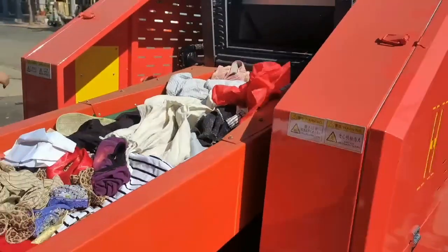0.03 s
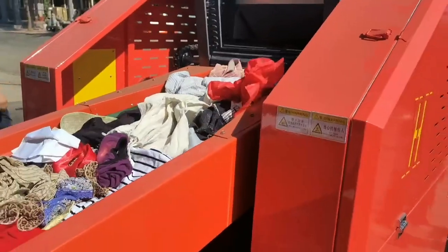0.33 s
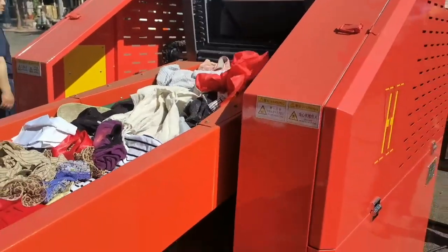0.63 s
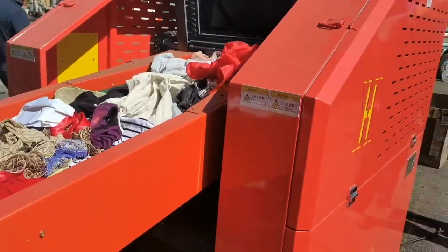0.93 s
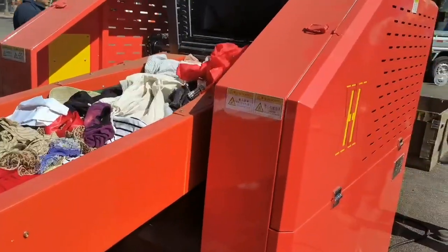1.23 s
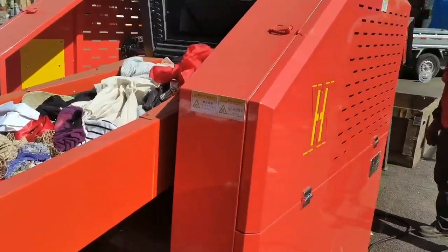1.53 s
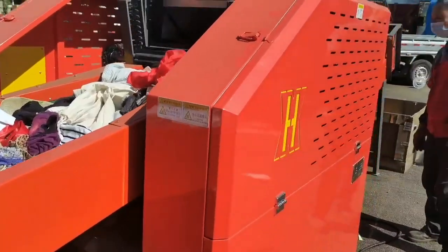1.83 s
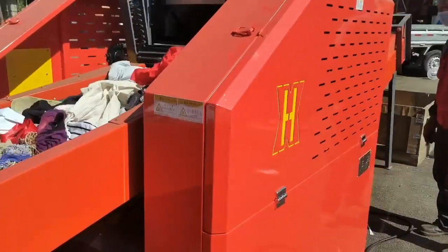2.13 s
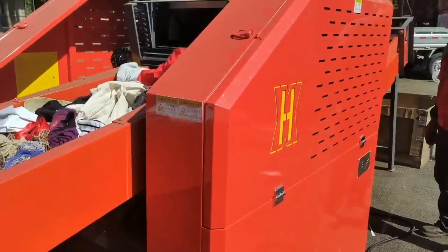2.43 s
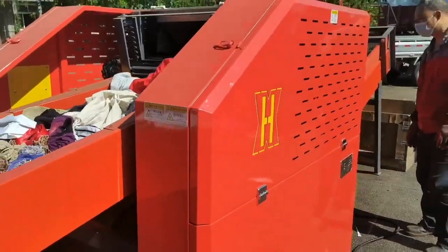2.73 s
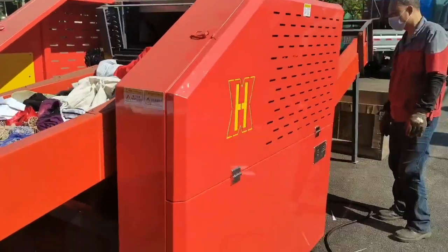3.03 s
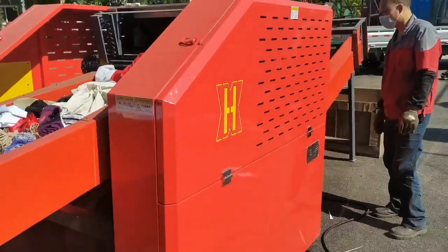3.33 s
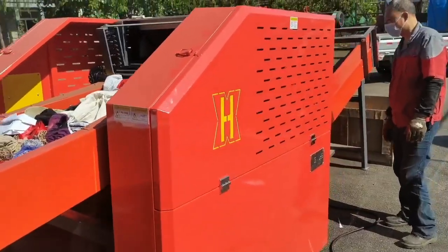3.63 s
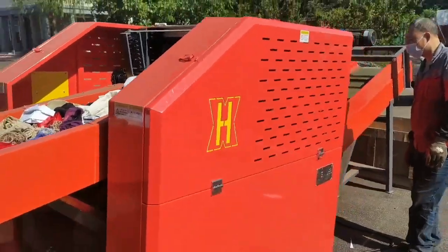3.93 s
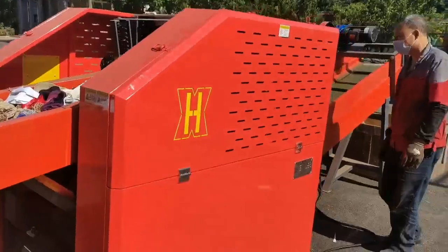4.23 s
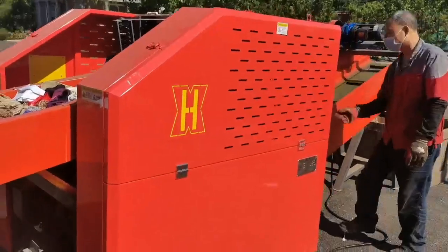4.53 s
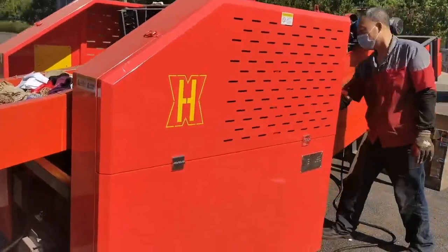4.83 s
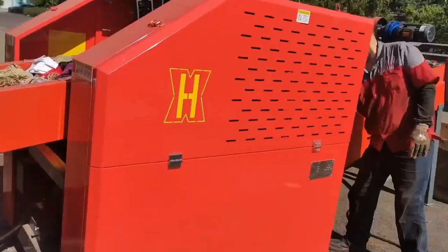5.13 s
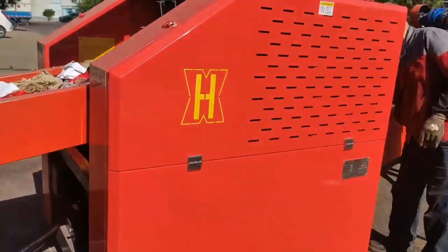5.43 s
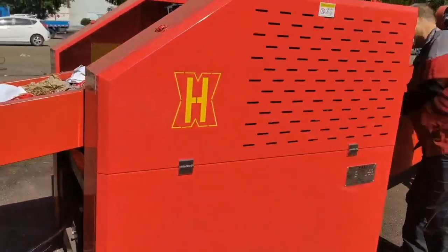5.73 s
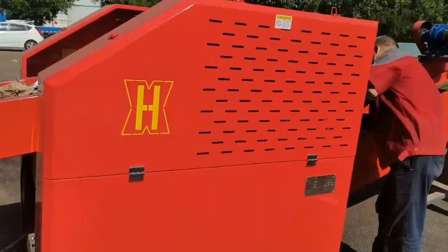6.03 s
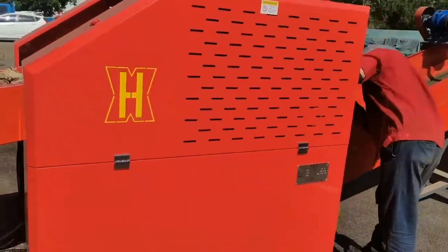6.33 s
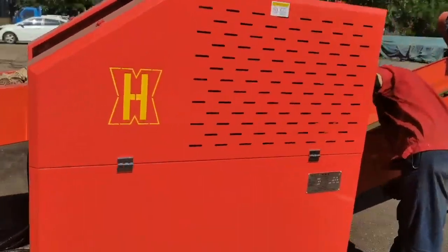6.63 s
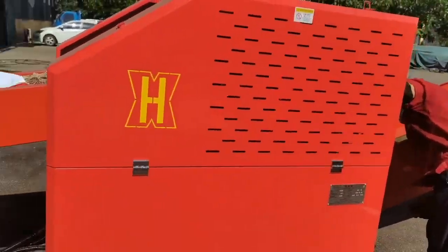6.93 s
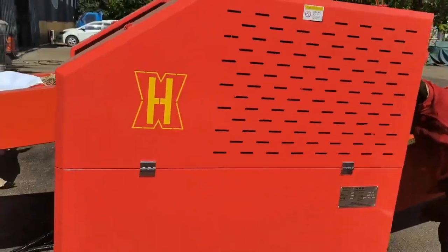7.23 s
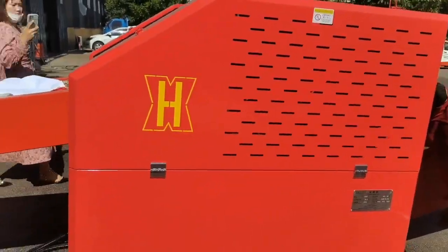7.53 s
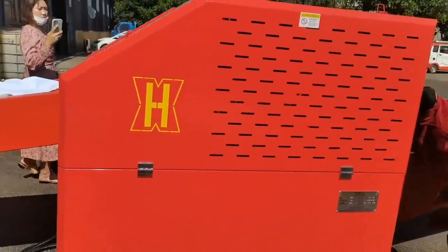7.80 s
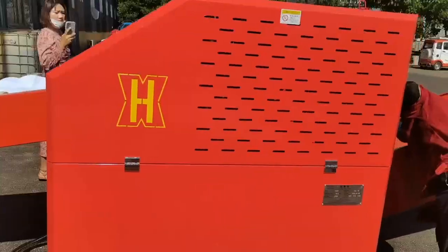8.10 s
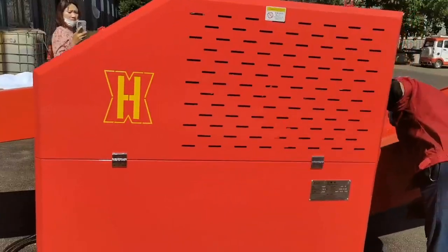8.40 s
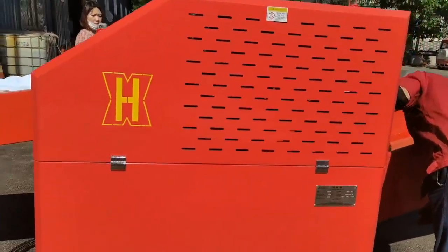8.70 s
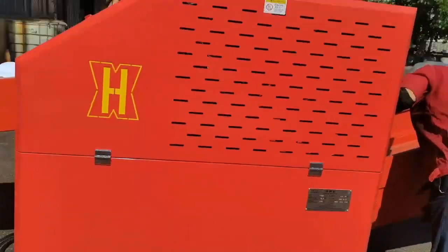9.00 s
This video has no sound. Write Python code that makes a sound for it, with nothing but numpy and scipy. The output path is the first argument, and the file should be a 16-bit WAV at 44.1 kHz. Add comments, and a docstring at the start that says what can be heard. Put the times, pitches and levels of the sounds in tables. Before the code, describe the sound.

Loud, throbbing machine hum from an outdoor shredder, its blades scraping and clanking through cloth in a fast, even rhythm.

```python
"""Outdoors, a big cloth shredder is running. Every turn of its cutter repeats the same gear knocks, which
set the steel housing droning, and the same round of metallic scrapes as the blades bite the cloth.
The drive rattles and whines, loose parts tap the panels, and the bites make the cutter box clank.
The microphone is carried past three places: the feed belt, a corner and the side of the drive guard,
where a little wind catches it."""
import sys
import numpy as np
from scipy import signal
from scipy.fft import rfft, irfft, next_fast_len
from scipy.io import wavfile
from scipy.ndimage import map_coordinates

SR = 44100
rng = np.random.default_rng(int(sys.argv[2]) if len(sys.argv) > 2 else 0)


def digitize_waveform(pressure):
    """Quantize a signal to 16-bit integers and store it at the path in sys.argv[1].

    Rows of a 2-D input are taken as channels; values are limited to [-1, 1].
    """
    field = np.atleast_2d(pressure).T
    bounded = np.clip(field, -1, 1)
    quanta = np.round(bounded * 32767).astype(np.int16)
    wavfile.write(sys.argv[1], SR, quanta)


N = 399546

TURN_HZ = 3.828  # turns of the cutter per second
TOP_HZ = 14200  # the highest sound the microphone picks up

# the housing's strong tones: (multiple of the turn rate, level at belt [dB], corner [dB], guard [dB])
STRONG_TONES = [(18, -48.5, -46.5, -43.0), (24, -52.5, -47.5, -44.0), (34, -45.0, -48.0, -41.5),
                (36, -45.0, -50.0, -44.0), (37, -36.5, -44.0, -41.0), (38, -38.5, -44.0, -43.5),
                (40, -50.0, -48.0, -42.0), (42, -43.0, -46.0, -48.0), (46, -38.0, -36.0, -36.0),
                (47, -46.0, -42.0, -40.0), (48, -45.0, -41.5, -36.0), (54, -41.0, -43.5, -38.0),
                (57, -42.0, -41.5, -44.0), (58, -31.5, -31.0, -39.0), (59, -36.5, -35.5, -37.5),
                (60, -33.5, -34.5, -38.5), (61, -38.5, -37.0, -39.0), (62, -34.0, -32.5, -36.5),
                (64, -43.0, -47.0, -31.5), (65, -39.5, -45.0, -31.5), (66, -39.0, -36.0, -32.0),
                (67, -44.5, -41.5, -34.0), (68, -54.5, -40.5, -33.5), (70, -41.0, -45.5, -33.0),
                (71, -33.5, -37.0, -36.0), (76, -42.5, -46.0, -46.0), (77, -45.0, -46.0, -43.0),
                (83, -48.0, -47.0, -34.5), (84, -49.0, -47.5, -36.5), (85, -46.5, -42.5, -39.5),
                (86, -51.0, -47.5, -37.0), (88, -52.0, -50.0, -40.0), (89, -48.0, -55.0, -41.5),
                (94, -42.5, -50.0, -37.5), (95, -37.5, -47.5, -35.0), (101, -43.5, -43.0, -41.0),
                (111, -43.0, -50.0, -46.5), (112, -45.0, -49.0, -44.0), (131, -50.0, -57.0, -43.0)]
# the housing's weaker tones: (pitch [Hz], level at belt [dB], corner [dB], guard [dB])
WEAK_TONES = [(30,-74,-74,-68), (55,-67,-66,-60), (80.4,-58,-56,-54), (116,-51,-48,-43.5),
              (160.2,-48,-52,-46), (202,-44,-46,-44), (240.5,-49,-50.5,-42), (273.3,-48,-45.5,-40.5),
              (323.4,-47.5,-49.5,-43), (400.4,-49,-50.5,-45.5), (471,-53,-58,-53), (548,-65,-58,-58)]
# the blades in biting order: (clank [dB], rasp [dB], hiss [dB], heel chink [dB], fade time [s])
BLADES = [(-29.5,-28.5,-31.5,-26,0.027), (-29.5,-33,-33,-34,0.022), (-52,-32.5,-38,-31,0.019),
          (-29,-28.5,-32,-44,0.028), (-24.5,-31,-38.5,-58,0.019), (-50,-34,-32.5,-51,0.02)]


def housing_drone(turn, near):
    """The gears shake the steel housing into a hum, with a loose churning that is strongest at the guard."""
    churn_db = [-19, -17.5, -13]  # belt, corner, guard
    hum = each_turn(hum_cycles(), turn, near)
    churn = coloured(noise(), np.array(WEAK_TONES)[:, [0, -1]])
    return unit(hum + (amp(churn_db) @ near) * churn)


def hum_cycles(size=256):
    """One turn of the housing's shaking at each place: each pitch range swells at its own knocks."""
    # the housing's pitch ranges: (bottom [Hz], top [Hz], half a knock's length [s],
    # steady gear contact compared with the loudest knock [dB])
    pitch_ranges = [(110, 200, .0075, -13), (200, 290, .0072, -20), (290, 520, .0038, -14)]
    multiple = np.arange(size)
    weak = ~np.isin(multiple, [row[0] for row in STRONG_TONES])
    strength = np.array([tone_strengths(multiple, place + 1) for place in range(3)])
    tones = strength * np.exp(2j * np.pi * rng.random(size))
    for low, high, *knock in pitch_ranges:
        inside = (multiple * TURN_HZ >= low) & (multiple * TURN_HZ < high)
        forces = [gear_knocks(multiple / size, place, low, high, *knock) for place in range(3)]
        swings = [follow_knocks(inside * strength[place], weak, forces[place]) for place in range(3)]
        for place, swing in enumerate(swings):
            in_step = np.exp(1j * np.angle(np.vdot(swing, swings[1])))  # neighbouring places swing together
            tones[place, inside] = (swing * in_step)[inside]
    return irfft(tones, 16 * size)


def tone_strengths(multiple, column):
    """The housing hums at multiples of the turn rate: a few strong tones among many weak ones."""
    db = along(np.array(WEAK_TONES)[:, [0, column]], multiple * TURN_HZ)
    for row in STRONG_TONES:
        db[int(row[0])] = row[column]
    return amp(db)


def gear_knocks(turn, place, low, high, half_s, steady_db):
    """The gears push steadily and knock on top of that; this is their force in one pitch range."""
    # low thuds to higher clacks: (moment [turns], pitch [Hz], level at belt [dB], corner [dB], guard [dB])
    knocks = [(.08,150,-36,-33,-24), (.135,150,-28,-27,-24), (.19,150,-33,-33,-21), (.24,150,-26,-27,-24),
              (.37,150,-26,-28,-27), (.48,150,-20,-24,-22), (.6,150,-24,-23,-22), (.665,150,-32,-32,-23),
              (.725,150,-23,-24,-29), (.775,150,-38,-28,-21), (.835,150,-27,-29,-22), (.98,150,-25,-26,-25),
              (.01,240,-19,-22,-28), (.125,240,-29,-26,-18), (.215,240,-20,-19,-14), (.295,240,-18,-20,-26),
              (.38,240,-26,-22,-16), (.465,240,-17,-17,-18), (.54,240,-20,-21,-21), (.6,240,-21,-28,-25),
              (.705,240,-18,-15,-17), (.785,240,-19,-19,-16), (.865,240,-19,-20,-20), (.92,240,-24,-25,-17),
              (0,360,-29,-31,-21), (.075,360,-26,-29,-23), (.135,360,-21,-27,-22), (.165,360,-25,-21,-19),
              (.21,360,-24,-24,-17), (.24,360,-26,-28,-17), (.32,360,-22,-26,-17), (.38,360,-22,-25,-20),
              (.43,360,-22,-26,-23), (.47,360,-26,-23,-21), (.51,360,-24,-23,-28), (.58,360,-28,-31,-19),
              (.64,360,-23,-28,-27), (.69,360,-32,-30,-22), (.825,360,-27,-29,-19), (.895,360,-30,-28,-19),
              (.945,360,-22,-28,-20)]
    rows = np.array([row for row in knocks if low < row[1] < high])
    db = rows[:, 2 + place]
    return np.sqrt(blows(turn, rows[:, 0], db - db.max(), half_s) + amp(steady_db) ** 2)


def follow_knocks(strength, weak, force, steps=60, tries=48):
    """Line the tones up so that together they swell with the force; only weak ones may change strength."""
    force = force * np.linalg.norm(strength) / np.sqrt(len(force)) / np.linalg.norm(force)
    least, most = np.where(weak, 0, strength), np.where(weak, np.sqrt(2), 1) * strength
    tones = strength * np.exp(2j * np.pi * rng.random((tries, len(force))))
    for _ in range(steps):
        swing = np.fft.ifft(tones)
        driven = np.fft.fft(force * swing / (abs(swing) + 1e-20))
        tones = driven / (abs(driven) + 1e-20) * np.clip(abs(driven), least, most)
    miss = np.linalg.norm(abs(np.fft.ifft(tones)) - force, axis=1)
    return tones[np.argmin(miss)]


def cutter(turn, near):
    """Blade scrapes and steady rubbing reach us through the steel frame."""
    _, corner, guard = near
    contact = rubbing() + blade_scrapes(turn, near)
    direct = steel_frame(contact, shade_db=0)
    screened = steel_frame(contact, shade_db=-5)
    frame = (1 - guard) * direct + guard * screened
    hollow = .28 * resonate(frame, hz=3500, width=1000)  # the corner hollows out the hiss
    return amp(-0.25) * (frame - corner * hollow)


def blade_scrapes(turn, near, uneven_db=0.85):
    """Each blade's edge scrapes through the cloth, and its back end, the heel, chinks just after."""
    # an edge's rasp, then its hiss: (pitch [Hz], width [Hz], rise time [s])
    edge_bands = [(2650, 2860, 0.011), (4580, 1270, 0.0049)]
    # the heel's chink, ring, bright splash and thud: (pitch [Hz], width [Hz], level [dB])
    heel_bands = [(5480, 2300, -1.5), (5350, 140, -13.5), (7540, 21000, -9), (466, 160, -8.5)]
    rasp_db = [-0.8, -1, 0]  # belt, corner, guard
    friction = grains(per_second=1200, spread_db=2.7, share=0.3)

    def band(hz, width):
        return ring(np.roll(friction, rng.integers(N)), hz, width)

    _, *edge_db, chink_db, falls = np.transpose(BLADES)
    edge = [strokes(turn, db, rise, falls[:, None], uneven_db)
            for db, (_, _, rise) in zip(edge_db, edge_bands)]
    rasp, hiss = (force * band(hz, width) for force, (hz, width, _) in zip(edge, edge_bands))
    snags = unit(amp(1.06 * wobble(130)))  # cloth catches and slips along the edge
    scrape = (amp(rasp_db @ near) * rasp + hiss) * snags
    spray = amp(-10) * band(hz=6440, width=1330)  # the bright fringe of the hiss
    fizz = amp(-10) * band(hz=10800, width=6800)  # tearing fibres
    heel = strokes(turn, chink_db, rise_s=0.0062, fall_s=0.023, uneven_db=uneven_db, delay_s=.0105)
    ringing_blades = blade_ring(np.hypot(edge[-1], heel), near)
    chink = heel * sum(amp(db) * band(hz, width) for hz, width, db in heel_bands)
    return scrape + edge[-1] * (spray + fizz) + ringing_blades + chink


def strokes(turn, levels_db, rise_s, fall_s, uneven_db, delay_s=0, size=512, count=40):
    """The evenly spaced blades each bite once a turn, harder when they catch more cloth."""
    grid = np.arange(size * count) / size  # in turns
    first_bite = 0.08  # in turns
    since = grid - first_bite - delay_s * TURN_HZ - np.arange(len(BLADES))[:, None] / len(BLADES)
    bite = np.floor(since + 1 / 4).astype(int)
    caught_db = uneven_db * rng.standard_normal((len(BLADES), count + 1))
    strength = amp(levels_db[:, None] + np.take_along_axis(caught_db, bite, axis=1))
    contacts = strength * swell((since - bite) / TURN_HZ, rise_s, fall_s)
    return np.interp(turn, grid, np.linalg.norm(contacts, axis=0))


def blade_ring(force, near, varies_db=2.5):
    """The struck blades ring, and each bite brings out a different mix of their notes."""
    # the blades' notes: (pitch [Hz], width [Hz], level at belt [dB], corner [dB], guard [dB])
    notes = [(4336,110,-44,-44,-48), (4580,110,-44,-44,-46), (5080,110,-41,-45,-46), (5250,60,-45,-42,-48),
             (5432,45,-43,-48,-50), (5620,110,-46,-46,-46)]
    return sum(ringing([note], force * amp(varies_db * wobble(8)) * noise(), near) for note in notes)


def rubbing():
    """Belts and cloth rub all the time with a grainy hiss."""
    # the tone colour of the rubbing: (pitch [Hz], level [dB])
    colour = [(300, -2.5), (900, -2.5), (1120, -2.5), (1400, -5.5), (1900, -7), (2400, -4.5), (3400, -9.5),
              (4500, -5), (6000, -8.5), (7500, -7.5), (8400, -35.5), (14500, -8)]
    level = amp(-33 + 0.7 * wobble(20))
    return level * coloured(grains(per_second=800, spread_db=4, share=0.43), colour)


def steel_frame(x, shade_db, ripple_db=1.7):
    """The frame's countless notes make a sound metallic; the guard's shade dulls its highs."""
    bumps = np.clip(rng.standard_normal(700), -2, 2)
    pitches = np.linspace(0, SR / 2, len(bumps))
    return filtered(x, lambda hz: amp(ripple_db * np.interp(hz, pitches, bumps)
                                      + shade_db * (hz / TOP_HZ) ** 2))


def clatter(turn, near, rattle_db=-37.0, between_bites_db=-36):
    """The drive rattles and taps the panels; each bite shakes the cutter box into a ringing clank."""
    # the tone colour of the drive's rattle: (pitch [Hz], level [dB])
    rattle_colour = [(480,-3), (560,-4.5), (680,-0.5), (1000,-1.5), (1090,-9.5), (1600,-3.5), (1850,-15),
                     (2600,-18)]
    # the steel panels' notes: (pitch [Hz], width [Hz], level at belt [dB], corner [dB], guard [dB])
    panel_notes = [(425.6,25,-45,-68,-59), (624.7,46,-42.5,-39,-41.5), (697,36,-43.5,-49,-41),
                   (772,40,-44,-44.5,-39.5), (843,78,-61,-53,-41.5), (947.4,62,-42,-41.5,-42),
                   (1643,35,-51,-50,-40.5), (2117,95,-50,-51,-47.5), (2495,28,-56,-49,-47)]
    # the cutter box's notes: (pitch [Hz], width [Hz], level at belt [dB], corner [dB], guard [dB])
    box_notes = [(1245.5,71,-40,-42,-39.5), (1289,57,-41,-41.5,-43), (1448,47,-42,-51,-45),
                 (1533,170,-37.5,-40.5,-39), (1652,70,-45,-46,-47)]
    clank_db, *_, falls = np.transpose(BLADES)
    bites = strokes(turn, clank_db, rise_s=0.0073, fall_s=falls[:, None], uneven_db=1.0)
    shaking = np.hypot(bites, amp(between_bites_db))
    taps = tapping(turn, near)
    drive = amp(rattle_db) * coloured(taps * rattle(turn, near), rattle_colour)
    panels = ringing(panel_notes, taps * rattle(turn, near), near)
    clank = ringing(box_notes, shaking * (rattle(turn, near) + .5 * noise()), near)
    return drive + panels + clank


def rattle(turn, near, size=8192):
    """Chatter that mostly comes round again each turn."""
    return each_turn(rng.standard_normal((3, size)), turn, near) + .5 * noise()


def tapping(turn, near):
    """Loose parts tap the panels, and the rattle's strength leaps at each tap."""
    # one turn's taps: (moment [turns], level over the rattle at belt [dB], corner [dB], guard [dB])
    taps = [(.02,6,0,-6), (.16,2,6,5), (.207,7,-3,-3), (.278,10,5,2), (.312,-6,0,6), (.52,4,5,2),
            (.565,-6,-6,6), (.66,5,2,-6), (.755,-6,2,6), (.97,5,-3,-3)]
    moments, *levels = np.transpose(taps)
    power = near * blows(turn, moments, levels, half_s=0.0022)
    return unit(np.sqrt(1 + power.sum(axis=0)))


def drive_whine(near):
    """The drive gives off a thin, steady whine."""
    # the whine's note: (pitch [Hz], width [Hz], level at belt [dB], corner [dB], guard [dB])
    notes = [(3745, 36, -45.5, -47.5, -60)]
    return ringing(notes, noise(), near)


def wind(breeze_db=-64, rise_s=0.046, fall_s=0.075):
    """A faint breeze and a few gusts hit the microphone with a low rumble."""
    # gusts at their peak: (time [s], level [dB])
    gusts = [(8.17, -35), (8.38, -39), (8.69, -36), (9.0, -40)]
    colour = [(12, -16), (30, -8), (48, -7), (90, -7), (160, -31), (400, -35)]  # (pitch [Hz], level [dB])
    t = np.arange(N) / SR + 2 * rise_s
    force = amp(breeze_db) + sum(amp(db) * swell(t - s, rise_s, fall_s) for s, db in gusts)
    return force * amp(1.7 * wobble(18)) * coloured(noise(), colour)


def amp(db):
    """Turn decibels into a number to multiply by."""
    return 10 ** (np.asarray(db) / 20)


def unit(x):
    """Scale x to an average power of 1."""
    return x / np.sqrt(np.mean(x ** 2) + 1e-20)


def noise():
    """A plain, even hiss."""
    return rng.standard_normal(N)


def wobble(rate):
    """A smooth random curve that heads for a new value rate times a second."""
    return map_coordinates(rng.standard_normal(int(N * rate / SR) + 4), [np.arange(N) * rate / SR])


def grains(per_second, spread_db, share):
    """Rubbing noise with a share of its power in separate tiny ticks."""
    ticks = (rng.random(N) < per_second / SR) * np.sign(noise())
    ticks = ticks * amp(spread_db * np.clip(noise(), -2, 2))
    return np.sqrt(1 - share) * noise() + np.sqrt(share) * unit(ticks)


def along(points, hz):
    """Read a level between (pitch [Hz], level [dB]) points; beyond their ends it is silent."""
    pitches, levels = np.transpose(points)
    return np.interp(np.log(hz + 1), np.log(pitches + 1), levels, left=-120, right=-120)


def filtered(x, response):
    """Turn each pitch in x up or down by response(hz)."""
    size = next_fast_len(N + SR // 2)
    return irfft(rfft(x, size) * response(np.fft.rfftfreq(size, 1 / SR)), size)[:N]


def coloured(x, colour):
    """Give x a tone colour, at a power of 1."""
    return unit(filtered(x, lambda hz: amp(along(colour, hz))))


def resonate(x, hz, width):
    """Keep the part of x near one pitch."""
    return signal.lfilter(*signal.iirpeak(hz, hz / width, SR), x)


def ring(force, hz, width):
    """One note shaken by a force, at a power of 1; the narrower it is, the longer it rings."""
    return unit(resonate(resonate(force, hz, width), hz, width))


def ringing(notes, force, near):
    """Shaken steel rings at its own notes, each as loud as it is heard from where we stand."""
    return sum(ring(force, hz, width) * (amp(levels) @ near) for hz, width, *levels in notes)


def swell(t, rise, fall):
    """A quick rounded rise that peaks at t = 2 * rise, then a slower fall."""
    late = t - 2 * rise
    return np.where(late < 0, np.exp(-.5 * (late / rise) ** 2), np.exp(-.5 * (np.abs(late) / fall) ** 1.7))


def blows(turn, moments, levels_db, half_s):
    """The power of short rounded blows that come round once a turn."""
    apart_s = ((turn - moments[:, None] + .5) % 1 - .5) / TURN_HZ
    return amp(levels_db) ** 2 @ np.exp(-(apart_s / half_s) ** 2)


def each_turn(cycles, turn, near):
    """Play each place's one turn of sound round and round, and blend the places at even power."""
    loops = [np.interp(turn % 1, np.arange(len(c)) / len(c), unit(c)) for c in cycles]
    power = (near * (np.corrcoef(cycles) @ near)).sum(axis=0)
    return unit((near * loops).sum(axis=0) / np.sqrt(power))


def scene():
    """The shredder turns at an almost steady speed while we walk round it."""
    # the microphone's path: (time [s], place [0 = feed belt, 1 = corner, 2 = beside the guard])
    path = [(0, 0), (2.3, .05), (3.3, .65), (4.2, 1.05), (5.2, 1.55), (6, 1.85), (7, 2), (9.06, 2)]
    # at belt, corner, guard; the guard screens the blades on the way past
    drone_db, cutter_db = [-23, -23.5, -20.5], [1.63, 0.5, 1.57]
    turn = np.cumsum(TURN_HZ * (1 + .0005 * wobble(3))) / SR  # turns made so far
    place = np.interp(np.arange(N) / SR, *np.transpose(path))
    near = np.clip(1 - np.abs(place - np.arange(3)[:, None]), 0, 1)  # closeness to each place, 0 to 1
    throb_db = 0.63 * wobble(12)  # the drone swells and sinks a little with the load
    drone = amp(drone_db @ near + throb_db) * housing_drone(turn, near)
    cutting = amp(cutter_db @ near) * (cutter(turn, near) + drive_whine(near))
    return (drone + cutting + clatter(turn, near) + wind())[None]


def record(dry):
    """The microphone dulls the highs and keeps nothing above its limit."""
    # the microphone's dull top: (pitch [Hz], level [dB])
    response = [(1, 0), (7700, 0), (8700, -4.5), (10500, -4), (14500, -9)]
    return filtered(dry[0], lambda hz: amp(along(response, hz)) * (hz < TOP_HZ))[None]


dry = scene()
out = record(dry)
digitize_waveform(out)
```